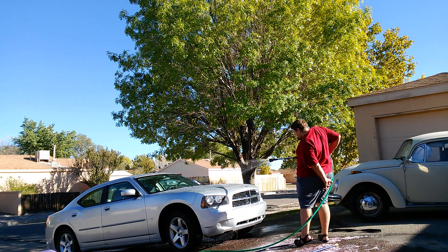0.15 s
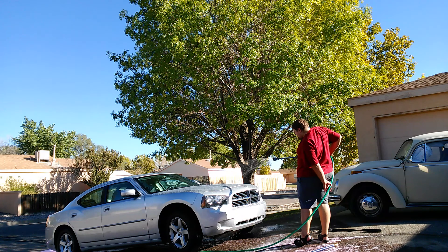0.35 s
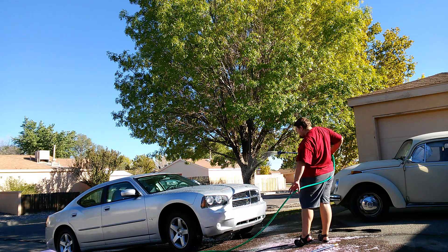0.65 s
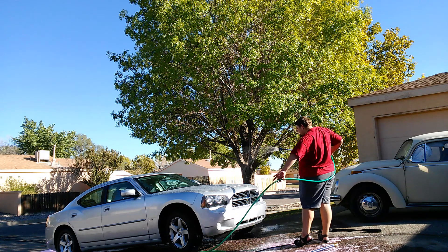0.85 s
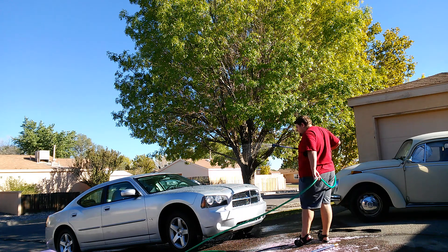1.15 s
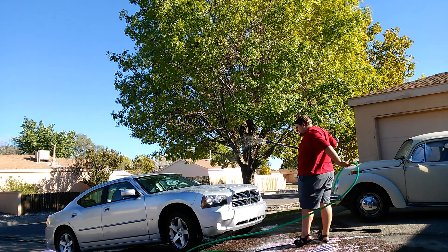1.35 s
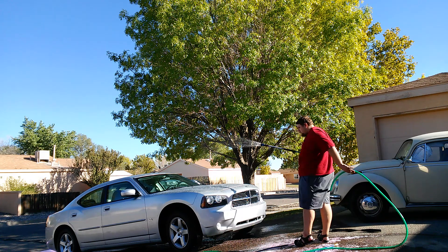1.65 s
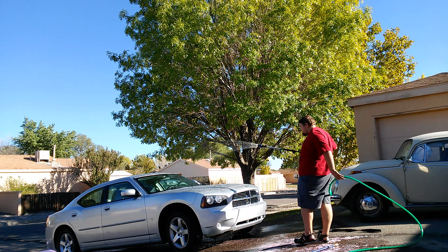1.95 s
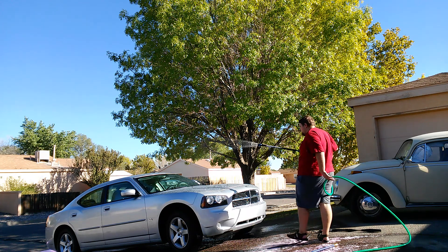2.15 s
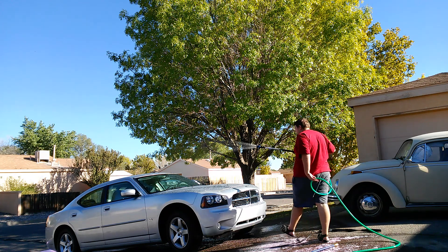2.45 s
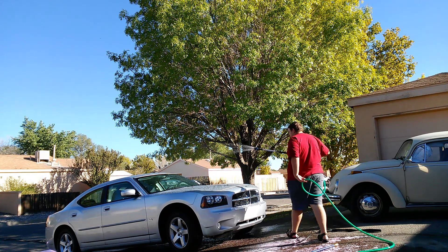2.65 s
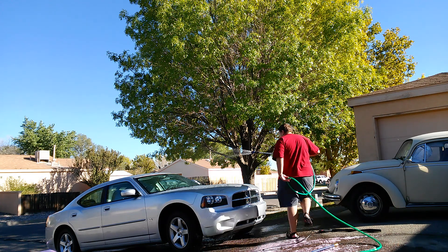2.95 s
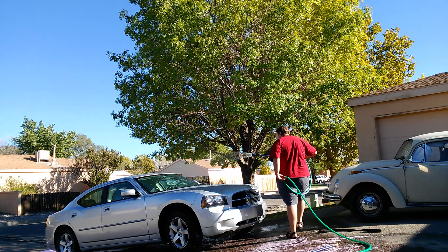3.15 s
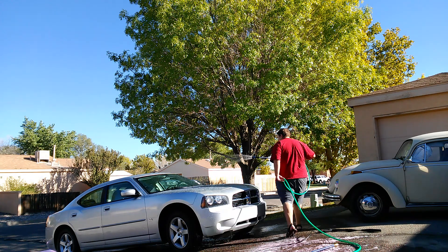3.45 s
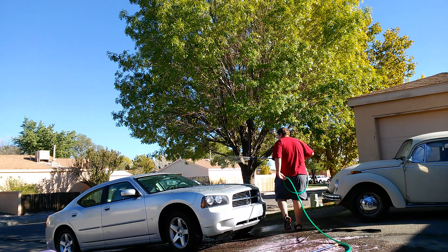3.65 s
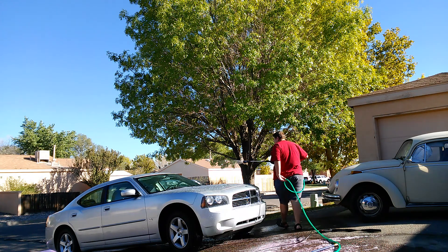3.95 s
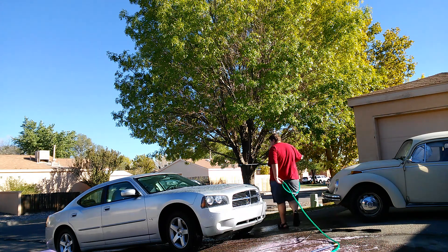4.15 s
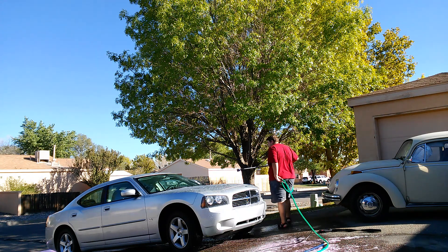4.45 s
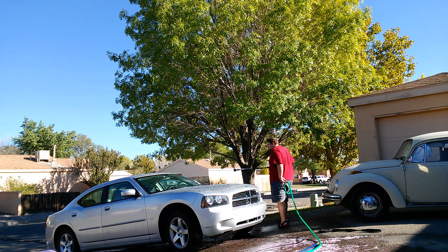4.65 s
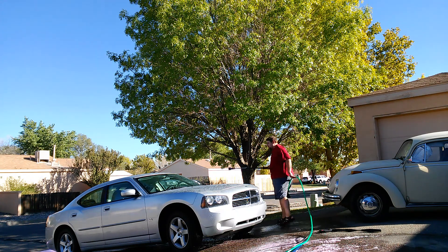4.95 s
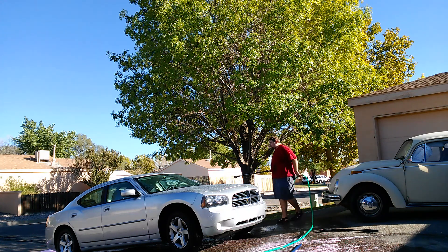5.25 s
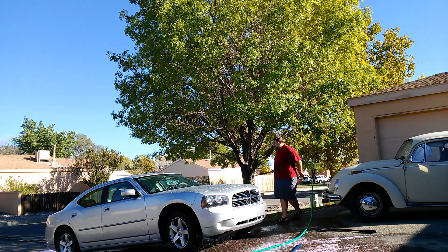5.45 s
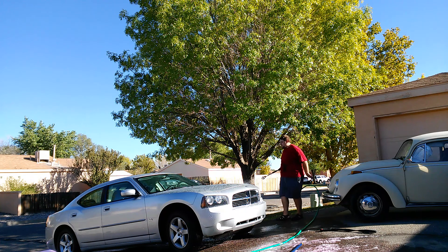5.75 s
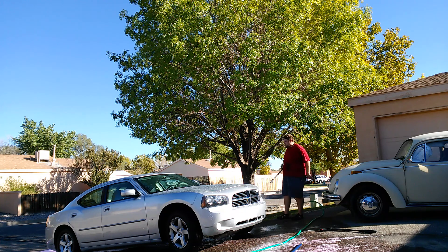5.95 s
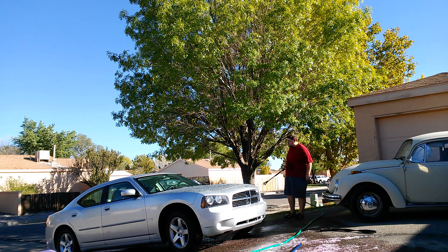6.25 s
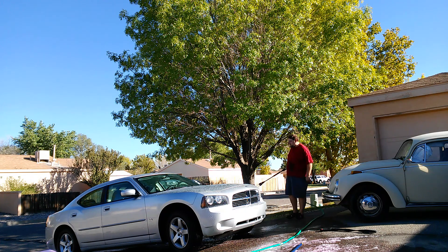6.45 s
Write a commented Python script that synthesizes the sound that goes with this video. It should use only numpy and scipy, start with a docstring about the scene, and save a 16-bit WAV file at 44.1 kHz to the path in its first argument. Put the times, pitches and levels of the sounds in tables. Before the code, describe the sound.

Outdoors in a quiet driveway, a hose sprays a car with a soft hiss and thin wavering high whistle over distant traffic. A sharp wet slap and scattered drips come early, then another slap as the hose slides. Later it bumps over something hollow with a quick run of knocks, followed by gritty scrapes and wet steps. The microphone stands back, catching slight breeze and short dull echoes.

```python
"""In a quiet driveway, with traffic rumbling far off, a man rinses a car: filtered grains of noise
hiss as fine spray and a narrow, wavering noise sings thinly near 7 kHz as the nozzle.
He swings the hose clear; it slaps and slides on wet concrete as damped resonances and crackle,
then bumps over something hollow, heard as ringing modes, and scrapes through grit as he walks on.
Air stirs at the microphone, and the garage front throws the contacts back as an echo."""
import sys
import numpy as np
from scipy import signal
from scipy.fft import rfft, irfft
from scipy.io import wavfile
from scipy.ndimage import uniform_filter1d

SR = 44100
rng = np.random.default_rng(int(sys.argv[2]) if len(sys.argv) > 2 else 0)


def master(y):
    """Save y as 16-bit WAV."""
    cut = np.clip(np.atleast_2d(y).T, -1, 1)
    pcm = np.round(cut * 32767)  # scale
    wavfile.write(sys.argv[1], SR, pcm.astype(np.int16))


N = 291396
TIME = np.arange(N) / SR


def from_db(db):
    """Decibels to amplitude gain."""
    return 10 ** (np.asarray(db) / 20)


def rms_one(x):
    """Scale to unit rms."""
    return x / np.sqrt(np.mean(x ** 2) + 1e-20)


def level(rows):
    """Gain over time, interpolated in dB between (time [s], level [dB]) rows."""
    return from_db(np.interp(TIME, *np.transpose(rows)))


def drift(rate):
    """Slow random wandering of rms 1, through `rate` random points a second."""
    count = int(TIME[-1] * rate) + 3
    points = rng.standard_normal(count)
    return rms_one(np.interp(TIME * rate, np.arange(count), points))


def swell(peak_s, rise, fall, hold=0):
    """Gain that rises exponentially to 1 at peak_s, holds and dies away; rise and fall are time constants."""
    before = (peak_s - TIME) / rise
    after = (TIME - peak_s - hold) / fall
    return np.exp(-np.maximum(np.maximum(before, after), 0))


def surges(rows, rest_db):
    """Swells above a resting level, added as powers."""
    power = sum((from_db(db) * swell(s, rise, fall)) ** 2 for s, db, rise, fall in rows)
    return np.sqrt(from_db(rest_db) ** 2 + power)


def grains(per_s, spread_db):
    """Tiny impacts at random moments, of uneven size; rms 1."""
    sizes = from_db(spread_db * np.clip(rng.standard_normal(N), -2, 2)) * rng.choice([-1, 1], N)
    return rms_one(sizes * (rng.random(N) < per_s / SR))


def colour(x, spectrum):
    """Causal (minimum-phase) filter with the given spectrum, falling steeply past its ends; rms 1."""
    hz, db = np.transpose(spectrum)
    size = 16384
    octave = np.log2(np.maximum(np.fft.rfftfreq(size, 1 / SR), 1))
    knots = np.log2(hz)
    outside = np.abs(octave - np.clip(octave, knots[0], knots[-1]))
    target_db = np.interp(octave, knots, db) - 18 * outside  # 18 dB per octave past the ends
    # folding the cepstrum onto positive times gives minimum phase
    cepstrum = irfft(np.log(from_db(target_db)))
    response = irfft(np.exp(rfft(2 * cepstrum[:size // 2], size)))
    return rms_one(signal.fftconvolve(x, response)[:N])


def resonate(x, hz, width_hz):
    """Two-pole resonance, gain 1 on top."""
    r = np.exp(-np.pi * width_hz / SR)
    zeros = np.array([1, 0, -1]) * (1 - r * r) / 2
    poles = [1, -(1 + r * r) * np.cos(2 * np.pi * hz / SR), r * r]
    return signal.lfilter(zeros, poles, x + 1e-18)


def waver(hz, width_hz, wander_hz, rate):
    """A narrow, noisy tone whose pitch wanders; rms 1."""
    smooth = signal.butter(2, width_hz / 2, fs=SR, output="sos")
    body = signal.sosfilt(smooth, rng.standard_normal(N) + 1j * rng.standard_normal(N))
    phase = 2 * np.pi * np.cumsum(hz + wander_hz * drift(rate)) / SR
    return rms_one(np.real(body * np.exp(1j * phase)))


def add(out, s, sound):
    """Mix a sound in at time s."""
    start = int(s * SR)
    out[start:start + len(sound)] += sound[:N - start]


# far traffic: (time [s], level before a common lift [dB])
TRAFFIC = [(0.0, -62), (1.58, -63), (1.88, -67), (3.85, -66.5), (4.58, -60), (6.13, -67.5), (6.61, -68.5)]
# spectrum of the far traffic: (frequency [Hz], density [dB per Hz])
TRAFFIC_COLOUR = [(100, 4.5), (170, -1), (330, -2.5), (500, -6.5), (720, -11), (920, -9.5), (1200, -20.5),
                  (2000, -28.5), (4000, -37)]
# gusts at the microphone: (peak time [s], level [dB], rise [s], fall [s])
GUSTS = [(0.18, -50, 0.11, 0.1), (.71, -51.5, 0.068, 0.11), (1.03, -50, 0.062, 0.032),
         (1.3, -49.5, 0.15, 0.13), (3.62, -53, 0.3, 0.3), (4.01, -52.5, 0.024, .04), (5.47, -60, .05, 0.16)]
# spectrum of the breeze at the microphone: (frequency [Hz], density [dB per Hz])
BREEZE_COLOUR = [(18, -2.5), (40, 1), (60, -1.5), (90, -10), (140, -16), (250, -37.5)]
STILL_AIR_DB = -59.5  # light steady air under the gusts
HUM_HZ, HUM_DB = 122.9, -66.5


def street(traffic_db=2.5):
    """Far traffic and microphone breeze as coloured noise, with a faint mains hum wavering in phase and level."""
    traffic_gain = level(TRAFFIC) * from_db(traffic_db + 1.0 * drift(13))
    traffic = colour(rng.standard_normal(N), TRAFFIC_COLOUR) * traffic_gain
    air_gain = surges(GUSTS, STILL_AIR_DB) * from_db(1.6 * drift(13))
    breeze = colour(rng.standard_normal(N), BREEZE_COLOUR) * air_gain
    tone = np.sin(2 * np.pi * HUM_HZ * TIME + 0.39 * drift(8.4))
    hum = rms_one(tone * from_db(3.7 * drift(9.7)))
    return traffic + breeze + from_db(HUM_DB) * hum


# echoes off garage and cars: (delay [s], level [dB])
ECHOES = [(.0215, -18), (0.0284, -17)]


def driveway(x, tail_db=-17, tail_t60=0.96, wall_hz=4500):
    """A few dull echoes and a thin decaying scatter from houses and tree."""
    t = TIME[:SR]
    onset = np.minimum(t / .02, 1)
    response = rng.standard_normal(SR) * from_db(-60 * t / tail_t60) * onset
    response *= from_db(tail_db) / np.linalg.norm(response)
    for delay, db in ECHOES:
        response[int(delay * SR)] += from_db(db)
    dull = signal.butter(2, wall_hz, fs=SR, output="sos")
    return signal.sosfilt(dull, signal.fftconvolve(x, response)[:N])


# a low, uneven gurgle that comes and goes: (peak time [s], level [dB], rise [s], fall [s])
GURGLES = [(.22, -59.5, 0.11, 0.11), (.97, -58, 0.12, 0.078), (1.5, -55.5, 0.24, 0.11),
           (5.0, -59, 0.21, 0.13)]
GURGLE_LOW_HZ, GURGLE_HIGH_HZ, GURGLES_PER_S = 130.6, 491, 110


def gurgle(count=10):
    """Random impacts ring low resonances: short blups at scattered pitches, in surges."""
    blups = np.zeros(N)
    for hz in np.geomspace(GURGLE_LOW_HZ, GURGLE_HIGH_HZ, count):
        impacts = grains(per_s=GURGLES_PER_S / count, spread_db=6.0)
        blups += rms_one(resonate(impacts, hz, hz / 22))
    return rms_one(blups) * sum(from_db(db) * swell(s, rise, fall) for s, db, rise, fall in GURGLES)


# spray on the car: (time [s], level [dB])
SPRAY = [(0.0, -78), (.7, -74), (.97, -71.5), (2.0, -72), (2.2, -83.5), (2.6, -77.5), (2.8, -73.5),
         (3.3, -78.5), (3.7, -71.5), (3.95, -71.5), (5.08, -73), (5.65, -70.5), (6.0, -83.5), (6.38, -79),
         (6.61, -95)]
# spectrum of the spray: (frequency [Hz], density [dB per Hz])
SPRAY_COLOUR = [(1200, -9), (2400, -2.5), (3050, 2.5), (3500, -2), (4200, 5), (6000, -15), (8500, -14),
                (11000, 0.5), (13000, -13), (16000, -28)]
# nozzle whistle: (frequency [Hz], width [Hz], level before the singing gain [dB])
WHISTLE = [(6990, 230, -65.5), (7290, 1200, -75)]
# how strongly the nozzle sings as it is turned: (time [s], gain [dB])
SINGING = [(0, -0.5), (.48, -3), (.64, 3.5), (.8, -2), (.9, 2), (1.95, 1), (2.4, -3), (2.59, -6), (2.72, 1),
           (2.93, -7.5), (3.03, 0), (3.45, -1.5), (3.9, -0.5), (5.4, -0.5), (6.61, -3)]
WHISTLE_WANDER_HZ = 63.5
WANDER_DB, WANDER_PER_S = 1.8, 18  # the whistle also swells and sinks by chance


def spray():
    """Countless fine droplets hiss; the jet whistles in the nozzle, wavering with the flow."""
    hiss = colour(grains(per_s=20000, spread_db=0.5), SPRAY_COLOUR) * level(SPRAY)
    whistle = sum(from_db(db) * waver(hz, width, WHISTLE_WANDER_HZ, 70) for hz, width, db in WHISTLE)
    singing = level(SINGING) * from_db(WANDER_DB * drift(WANDER_PER_S))
    return hiss + whistle * singing


# single drops flung onto wet ground: (time [s], level [dB], starting pitch [Hz])
DROPS = [(0.542, -42.5, 5230), (1.357, -55, 3200), (1.377, -45.5, 3920), (1.572, -41, 4370),
         (1.66, -45, 4000), (1.705, -46, 4530), (1.737, -47, 4170), (1.797, -44.5, 3680),
         (1.822, -46, 4500), (5.528, -51.5, 2980)]
DROP_CYCLES = 55  # a drop's bubble falls 60 dB in so many cycles
DROP_RISE_PER_S = 7.9  # its pitch climbs by this share of itself a second


def drops(splash_db=-5, splash_t60=0.003):
    """Each drop lands with a tiny splash and traps a bubble that plinks upward."""
    out, t = np.zeros(N), TIME[:SR // 30]
    for s, db, hz in DROPS:
        rising = np.sin(2 * np.pi * hz * t * (1 + DROP_RISE_PER_S * t / 2))
        plink = rising * from_db(-60 * t * hz / DROP_CYCLES)
        splash = resonate(rng.standard_normal(len(t)) * from_db(-60 * t / splash_t60), hz, hz)
        splash /= np.abs(splash).max()
        add(out, s, from_db(db) * (plink + from_db(splash_db) * splash))
    return out


# soles and hose squeezing water out: (peak time [s], level [dB], rise [s])
SQUELCHES = [(0.041, -57.5, 0.0036), (.18, -64.5, .002), (0.545, -61.5, .001), (1.38, -53.5, 0.03),
             (1.519, -55.5, 0.0032), (1.572, -49, 0.0023), (1.85, -62, 0.063), (3.564, -53.5, 0.01),
             (4.045, -52, 0.01), (4.565, -58.5, 0.015), (5.3, -56.5, 0.077), (5.735, -59, 0.0072)]
# spectrum of their fizz: (frequency [Hz], density [dB per Hz])
SQUELCH_COLOUR = [(2400, -33), (3200, -33), (3900, 10.5), (4700, 12), (5500, 4), (8000, 5)]
SQUELCH_FALL_S, FALL_PER_RISE = 0.019, 0.87  # a slow squeeze also dies slowly


def squelches(drops_per_s=900, low_hz=3000, high_hz=5600, ring_hz=260, fizz_db=-4, count=12):
    """Water squeezed from under rubber fizzes up and dies away in a spatter of small ringing droplets."""
    push = sum(from_db(db) * swell(s, rise, SQUELCH_FALL_S + FALL_PER_RISE * rise)
               for s, db, rise in SQUELCHES)
    bunches = from_db(3.2 * np.clip(drift(110), -1, 1))
    fizz = colour(grains(per_s=1600, spread_db=8.0) * bunches, SQUELCH_COLOUR)
    droplets = sum(resonate(grains(per_s=drops_per_s / count, spread_db=3.0), hz, ring_hz)
                   for hz in np.geomspace(low_hz, high_hz, count))
    return push * rms_one(rms_one(droplets) + from_db(fizz_db) * fizz)


# the hose is pulled over wet concrete: (peak time [s], level before a common lift [dB], rise [s], fall [s])
PULLS = [(1.38, -64, 0.1, 0.12), (1.585, -54.5, 0.024, 0.17), (1.87, -61.5, 0.042, 0.034),
         (2.745, -60, 0.054, 0.05), (4.05, -67, 0.025, 0.7), (4.53, -59.5, 0.074, 0.082),
         (5.01, -61.5, 0.059, 0.015), (5.29, -61.5, 0.18, 0.052), (6.2, -71, 0.062, 0.14)]
# spectrum of the sliding hose: (frequency [Hz], density [dB per Hz])
SLIDE_COLOUR = [(900, 5.5), (2000, -2), (3000, -4.5), (4400, 0.5), (5800, 1.5), (8500, 1), (10700, 2.5),
                (13000, -2), (16000, -5.5)]
CREEP_DB = -72  # between pulls it creeps, before the same lift


def slide(lift_db=1.54):
    """The hose peels through the water film with a clumpy crackle; larger drops tick only while it is pulled."""
    pull = surges(PULLS, CREEP_DB)
    crackle = grains(per_s=7000, spread_db=3.0) * from_db(1.33 * drift(70))
    pulled_share = 1 - from_db(CREEP_DB) / pull
    ticks = from_db(-9.5) * grains(per_s=140, spread_db=7.0) * pulled_share
    return colour(crackle + ticks, SLIDE_COLOUR) * pull * from_db(lift_db)


# wet rubber chirps as it slips: (start [s], length [s], level [dB], pitch [Hz])
SQUEAKS = [(2.92, 0.022, -60.5, 936), (2.939, 0.044, -63, 785), (4.183, 0.039, -61.5, 2170),
           (4.251, 0.0068, -46.5, 2196), (4.253, 0.021, -59, 1355), (4.933, 0.042, -52.5, 1730)]
SQUEAK_ATTACK_S, SQUEAK_RELEASE_S = 0.0011, 0.0028
SQUEAK_WIDTH = 0.075  # width of each resonance, as a share of the pitch


def squeaks():
    """Rubber sticks and slips on the wet surface: short, rough chirps, each about one pitch."""
    out = np.zeros(N)
    for s, length, db, hz in SQUEAKS:
        once = resonate(rng.standard_normal(N), hz, SQUEAK_WIDTH * hz)
        tone = resonate(once, hz, SQUEAK_WIDTH * hz)
        # dividing by the running rms evens out the noise
        even = tone / np.sqrt(uniform_filter1d(tone ** 2, size=400) + 1e-12)
        out += from_db(db) * even * swell(s, SQUEAK_ATTACK_S, SQUEAK_RELEASE_S, length)
    return out


# strokes of hose and soles through grit: (start [s], length [s], level [dB])
SCRAPES = [(1.61, 0.022, -53.5), (2.72, 0.066, -62), (2.814, 0.025, -64.5), (4.026, 0.11, -59),
           (4.403, 0.18, -60.5), (4.622, 0.12, -52.5), (4.899, 0.15, -52), (5.201, 0.1, -54.5),
           (5.347, 0.12, -58.5), (5.714, 0.035, -56)]
# spectrum of the grit: (frequency [Hz], density [dB per Hz])
GRIT_COLOUR = [(300, -20), (520, -6), (660, 8.5), (800, 3.5), (1000, 3.5), (1300, -2.5), (1700, -6),
               (2900, -3.5), (4300, -23.5), (7000, -19.5)]
SCRAPE_ATTACK_S, SCRAPE_RELEASE_S = 0.0033, 0.043


def strokes(rows):
    """Gain over time of drags that start quickly, hold and let go."""
    return sum(from_db(db) * swell(s, SCRAPE_ATTACK_S, SCRAPE_RELEASE_S, length) for s, length, db in rows)


def scrapes(grit_per_s=650, pebbles_per_s=70, pebble_db=-2):
    """Grit catches and lets go in quick bunches under each stroke; a few larger stones click."""
    bunches = from_db(2.8 * np.clip(drift(160), -1, 1))
    grit = grains(per_s=grit_per_s, spread_db=1.0) * bunches
    pebbles = from_db(pebble_db) * grains(per_s=pebbles_per_s, spread_db=4.5)
    return strokes(SCRAPES) * colour(grit + pebbles, GRIT_COLOUR)


# the dragged hose groans: (start [s], length [s], level [dB])
GROANS = [(5.198, .25, -57)]
GROAN_HZ, GROAN_WIDTH_HZ, GROAN_WANDER_HZ = 732, 136, 60


def groans():
    """Rubber judders over the concrete with a hollow, wavering note."""
    return strokes(GROANS) * waver(GROAN_HZ, GROAN_WIDTH_HZ, GROAN_WANDER_HZ, 45)


# dull thuds of heels and heavy loops of hose: (time [s], level [dB])
THUDS = [(1.605, -51), (2.735, -51), (4.318, -48), (5.023, -46.5)]
# spectrum of the thuds: (frequency [Hz], density [dB per Hz])
THUD_COLOUR = [(150, 6), (450, 12), (700, 0)]
THUD_RISE_S, THUD_FALL_S = 0.0027, 0.028


def thuds():
    """Soft, heavy contacts as bursts of low noise: short, without a pitch."""
    weight = sum(from_db(db) * swell(s, THUD_RISE_S, THUD_FALL_S) for s, db in THUDS)
    return weight * colour(rng.standard_normal(N), THUD_COLOUR)


# the film of water cracks under a flat hit: (time [s], level [dB])
CRACKS = [(1.5697, -33.5), (2.7333, -42.5), (2.752, -52), (4.097, -46.5), (5.3845, -46)]
# spectrum of the cracks: (frequency [Hz], density [dB per Hz])
CRACK_COLOUR = [(2500, -0.5), (4500, 7), (10000, -1), (15000, -6)]
CRACK_RISE_S, CRACK_FALL_S = 0.00054, 0.0018


def cracks():
    """The water film bursts as a few milliseconds of bright noisy spatter."""
    burst = sum(from_db(db) * swell(s, CRACK_RISE_S, CRACK_FALL_S) for s, db in CRACKS)
    return burst * colour(rng.standard_normal(N), CRACK_COLOUR)


# slaps and steps on the wet ground: (time [s], peak level [dB], centre frequency [Hz])
SLAPS = [(1.3135, -41, 4620), (1.598, -43, 1600), (1.603, -28, 1580), (1.624, -35, 1390),
         (2.7338, -35, 850), (2.734, -39.5, 1900), (2.7522, -34, 1570), (2.761, -45.5, 1400),
         (2.817, -51, 1300), (4.047, -38.5, 770), (4.0687, -44, 1280), (5.1398, -34, 880),
         (5.16, -42.5, 1130), (5.2373, -37, 2130), (5.2372, -38, 826), (5.256, -44, 1630),
         (5.278, -34.5, 2780), (5.298, -45, 1210), (5.409, -35.5, 740), (5.41, -40, 1500),
         (5.428, -38, 1130), (5.5072, -43.5, 2800), (5.695, -47.5, 790)]
# values at 1 kHz; smaller, brighter contacts are broader and shorter
BODY_WIDTH_HZ, CORE_WIDTH_HZ, WIDTH_POWER = 860, 197.8, 2
SLAP_T60_S, T60_POWER = 0.036, -0.37


def slaps(splatter_db=-18, skirt_db=-24):
    """A sharp contact and a dying splatter of drops, coloured by the size of the contact."""
    out, t = np.zeros(N), TIME[:SR // 4]
    for s, db, hz in SLAPS:
        khz = hz / 1000
        broader = khz ** WIDTH_POWER
        t60 = SLAP_T60_S * khz ** T60_POWER
        splatter = from_db(splatter_db) * rng.choice([-1, 1], len(t)) * from_db(-60 * t / t60)
        push = (t == 0) + splatter
        body = resonate(push, hz, BODY_WIDTH_HZ * broader)
        sound = resonate(body, hz, CORE_WIDTH_HZ * broader) + from_db(skirt_db) * body
        add(out, s, from_db(db) * sound / np.abs(sound).max())
    return out


# the hollow body that the hose bumps over: (frequency [Hz], level [dB], 60 dB decay before ring factor [s])
HOLLOW_MODES = [(647, -17.5, 0.25), (966, -1.5, 0.1), (975, -20.5, 0.71), (1090, -10.5, 0.057),
                (1331, -7, 0.14), (1360, -8.5, 0.064), (1730, -20.5, 0.24), (2147, 3, 0.046),
                (2630, -4.5, 0.063), (3155, -5, 0.042), (3450, -12, 0.085), (4450, -14, 0.053)]
# its knocks: (time [s], strength [dB], extra on the modes at 1.2-1.5 kHz [dB],
# extra on the modes above 1.95 kHz [dB], softness cutoff of the contact [Hz], ring time factor [ratio])
KNOCKS = [(1.6024, -41.5, 0, 13.5, 2350, 0.69), (3.872, -62, 4, 6.5, 2000, 0.95),
          (4.2939, -48.5, 5.5, 13.5, 2130, 1.03), (4.3837, -39.5, -4, -0.5, 2180, .5),
          (4.41, -36, -1.5, -5, 1780, 0.96), (4.459, -45.5, -7, -10, 2000, 1.2),
          (4.566, -31.5, 2.5, -10, 1700, 0.52), (4.622, -28.5, 8, -5, 2090, 0.64),
          (4.670, -24, -0.5, -7.5, 2030, 0.63), (4.7195, -40.5, 9.5, 1, 2160, 0.94),
          (4.862, -43, 0, -6.5, 1800, 2.2), (4.9128, -29, -7, -18, 2300, 0.82),
          (4.934, -60, 6, 16.5, 3650, 0.69), (4.9748, -31.5, -5.5, -19, 2000, 0.96),
          (4.987, -46.5, 5, 2, 4400, 2.1), (5.009, -41, 3, 13, 3170, 0.54),
          (5.0455, -52.5, 10, 9, 3500, .7)]


def knocks(tick_db=-9, tick_t60=0.04, uneven_db=3.5, detune=0.0036, low_hz=590):
    """The point of contact decides which modes ring most; the hose damps them where it stays lying on the body."""
    out, t = np.zeros(N), TIME[:SR // 3]
    hz, mode_db, t60 = np.transpose(HOLLOW_MODES)
    for s, db, second_db, upper_db, soft_hz, ring in KNOCKS:
        loaded_hz = hz * (1 + detune * rng.standard_normal(len(hz)))
        decay = from_db(-60 * t / (ring * t60[:, None]))
        rings = np.sin(2 * np.pi * loaded_hz[:, None] * t) * decay
        favour_db = second_db * ((hz > 1200) & (hz < 1500)) + upper_db * (hz > 1950)
        gains = from_db(mode_db + favour_db + uneven_db * rng.standard_normal(len(hz)))
        tick = resonate(rng.standard_normal(len(t)) * from_db(-60 * t / tick_t60), soft_hz, soft_hz)
        sound = gains @ rings + from_db(tick_db + upper_db) * tick
        soft = signal.butter(3, soft_hz, fs=SR, output="sos")
        add(out, s, -from_db(db) * signal.sosfilt(soft, sound))
    # a small body radiates little bass
    return signal.sosfilt(signal.butter(6, low_hz, "high", fs=SR, output="sos"), out)


# spectrum of something loose buzzing against the body: (frequency [Hz], density [dB per Hz])
RATTLE_COLOUR = [(1000, -12), (1600, 10), (2700, -12), (3400, -8), (4300, -16)]
RATTLE_DB, RATTLES_PER_S, RATTLE_FALL_S = -21, 380, 0.036  # level relative to knock strength


def rattle():
    """Something loose rebounds quickly and at random after each knock, following its strength."""
    shaking = sum(from_db(db) * swell(s, 0.0039, RATTLE_FALL_S) for s, db, *_ in KNOCKS)
    return from_db(RATTLE_DB) * shaking * colour(grains(per_s=RATTLES_PER_S, spread_db=0), RATTLE_COLOUR)


def scene():
    """Hose and spray in the driveway, over the street; only the contacts are echoed."""
    hollow = knocks() + rattle()
    ground = slaps() + cracks() + thuds()
    dragged = squeaks() + scrapes() + groans()
    contacts = hollow + ground + dragged + drops()
    water = slide() + squelches() + gurgle() + spray()
    return (contacts + driveway(contacts) + water + street())[None]


def record(dry):
    """The top is cut steeply above 15.9 kHz."""
    return signal.sosfilt(signal.ellip(10, .2, 70, 15900, fs=SR, output="sos"), dry)


dry = scene()
out = record(dry)
master(out)
```